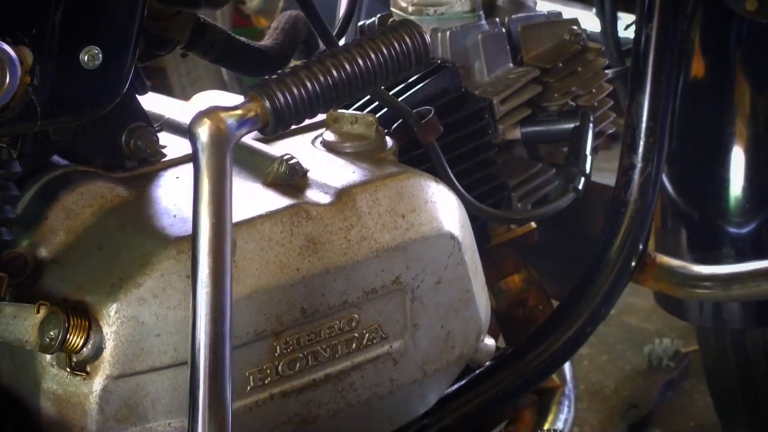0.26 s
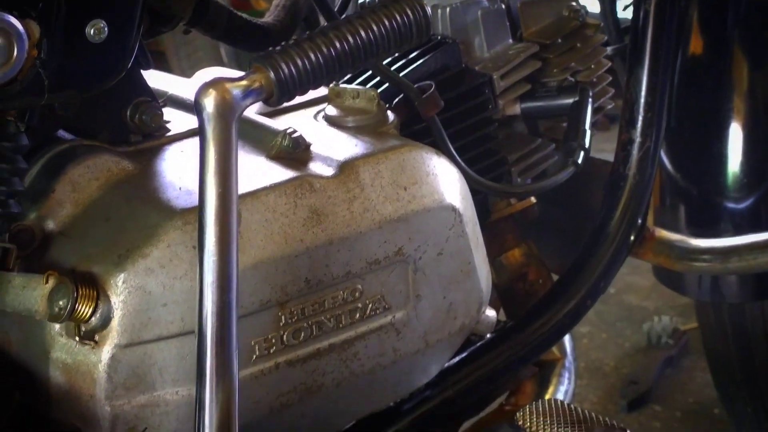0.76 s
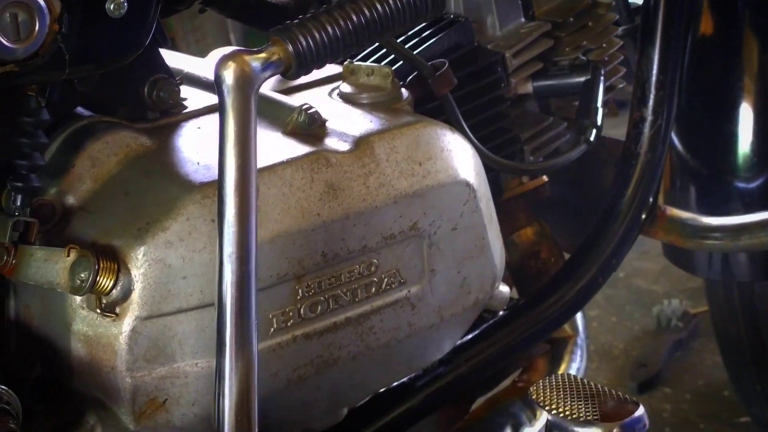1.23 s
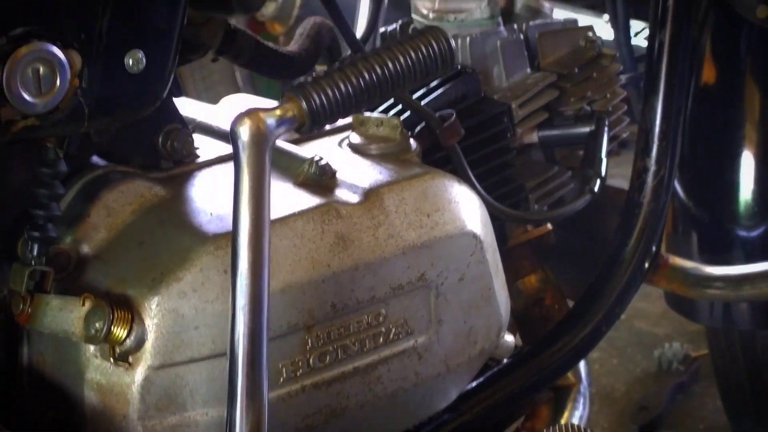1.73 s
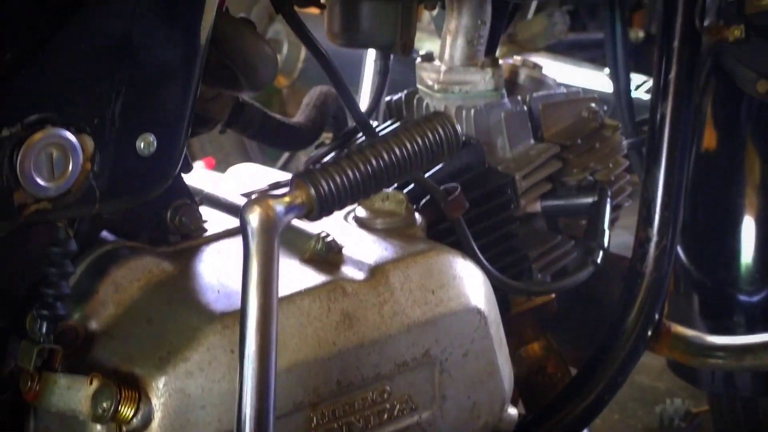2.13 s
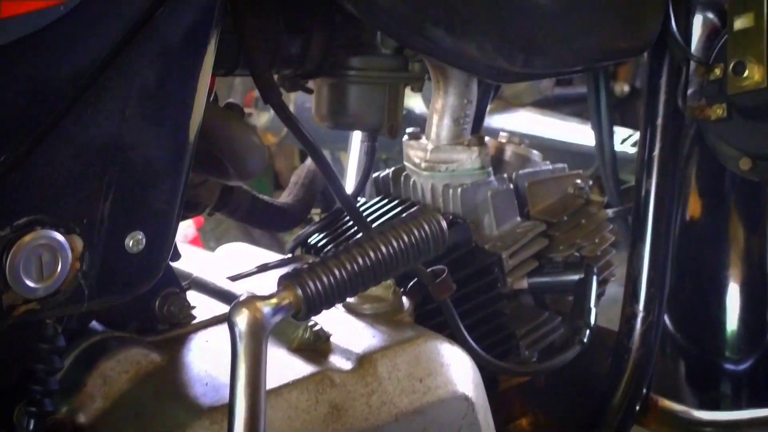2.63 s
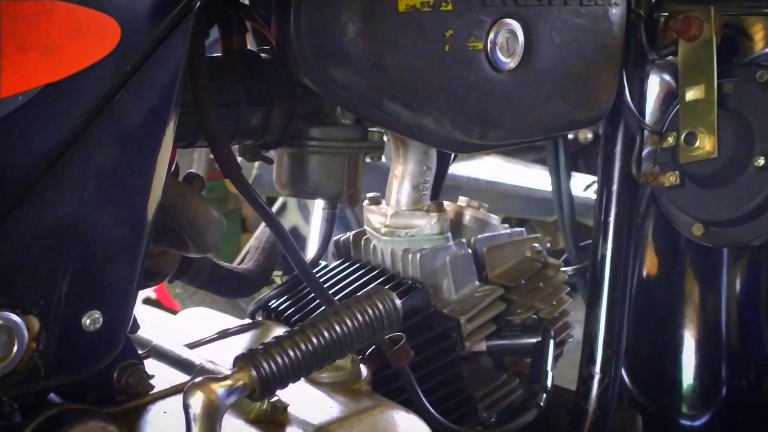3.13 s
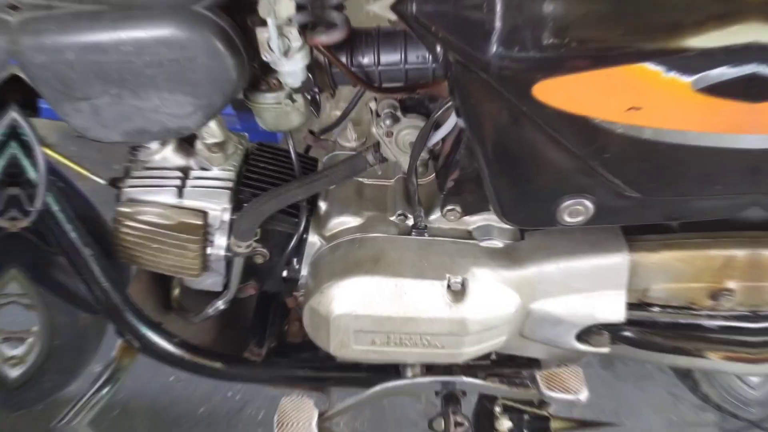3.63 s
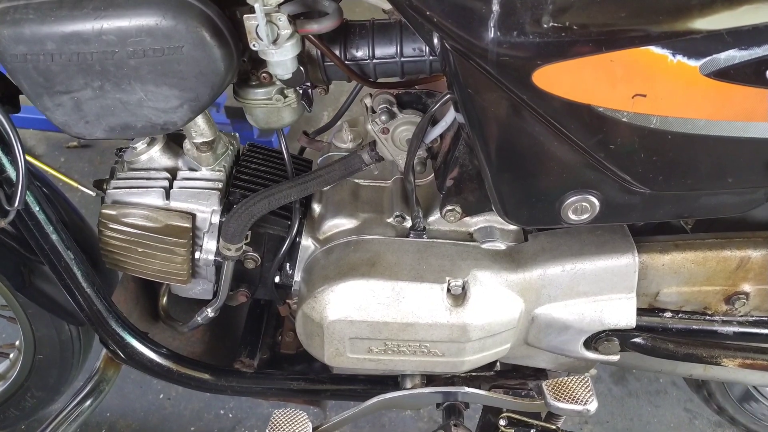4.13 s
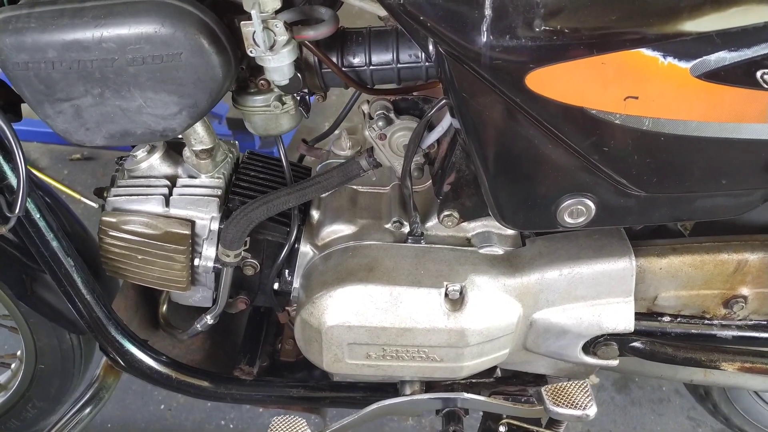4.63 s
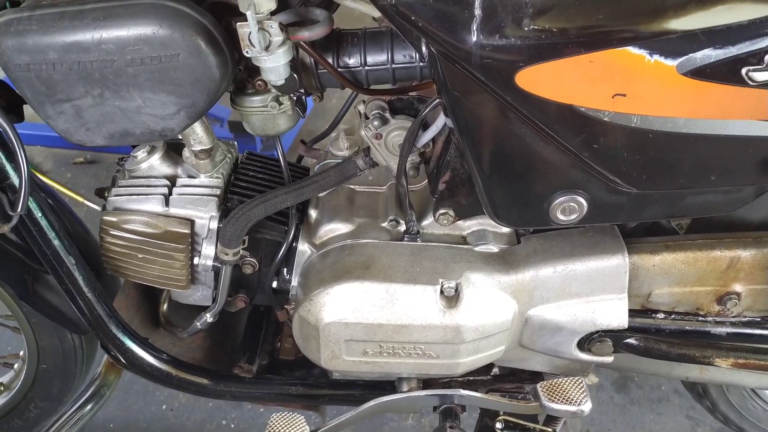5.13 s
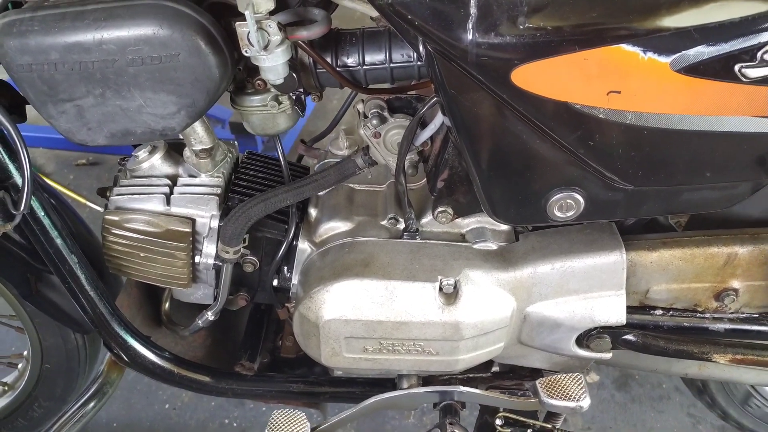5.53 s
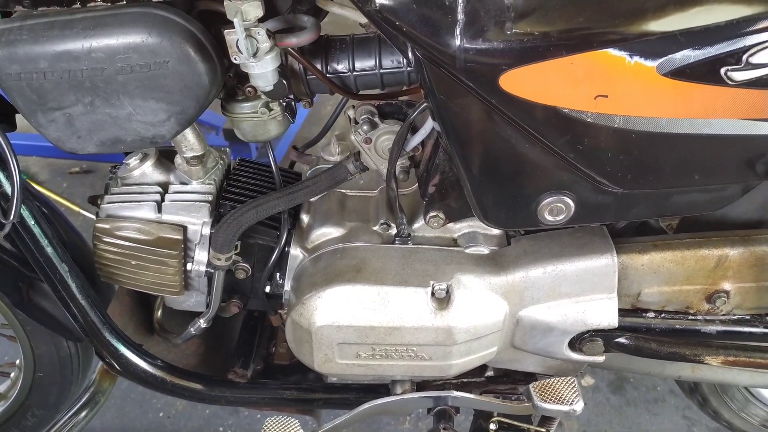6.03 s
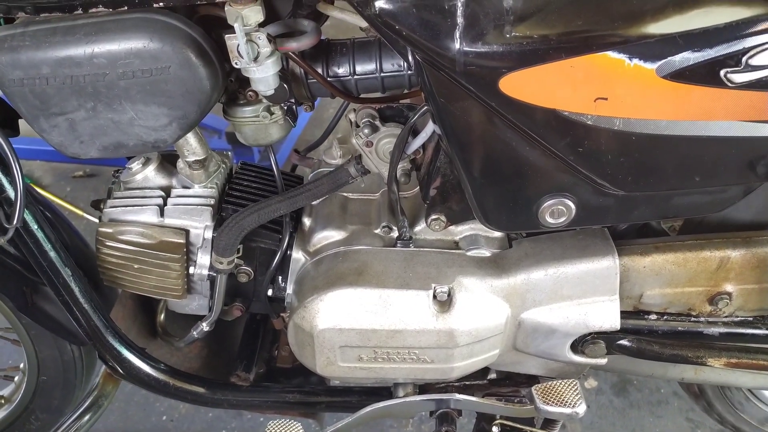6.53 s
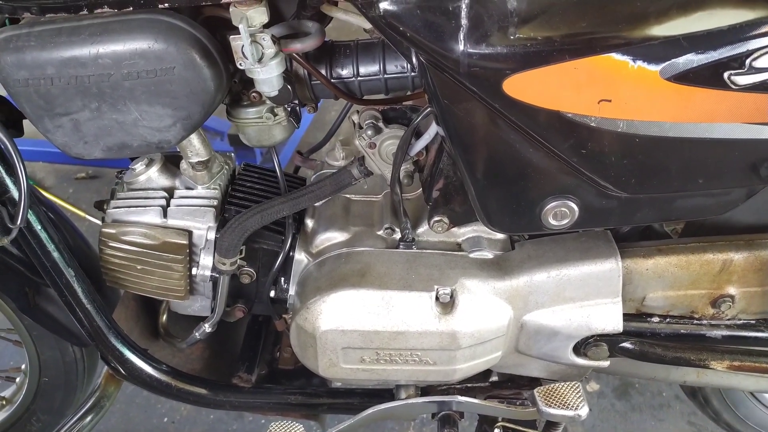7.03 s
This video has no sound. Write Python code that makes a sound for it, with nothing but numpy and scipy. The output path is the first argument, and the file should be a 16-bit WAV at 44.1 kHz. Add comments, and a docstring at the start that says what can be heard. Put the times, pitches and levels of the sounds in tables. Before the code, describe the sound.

Beside the exhaust port of a small single-cylinder motorcycle, an uneven idle chugs about ten times a second, with crisp gas cracks, metal knocks and low pipe thumps. It fades almost to silence midway, then swells back from above the crankcase, with harder casing knocks, ticking valves and softer exhaust. Near the end the throttle is blipped twice, the second rising higher. Close stereo microphone, short workshop reflections.

```python
"""A workshop where a single-cylinder four-stroke idles, heard first beside the exhaust port, then, after a fade
through near silence, from above the crankcase, where the throttle is blipped. Each burn knocks the casing with
noise through its resonances; the opening valve lets out cracks of coloured noise and rings the pipe's sine modes.
Valve ticks, clatter, hiss and rumble are coloured noise too; low tones follow the revs, and the walls reflect it all."""
import sys
import numpy as np
from scipy import signal
from scipy.fft import rfft, irfft, next_fast_len
from scipy.io import wavfile
from scipy.ndimage import uniform_filter1d

SR = 44100
rng = np.random.default_rng(int(sys.argv[2]) if len(sys.argv) > 2 else 0)


def wav_out(sig):
    """Save sig, one row per channel (or a flat mono array), as 16-bit PCM at SR to the path in sys.argv[1]."""
    wavfile.write(sys.argv[1], SR, np.round(np.clip(np.atleast_2d(sig).T, -1, 1) * 32767).astype(np.int16))


N = 321489
TIME = np.arange(N) / SR  # s
CUT_S, REV_S = 3.567, 5.9  # change of place; the blips begin
BURN_LEAD_S = .017  # the burn starts this long before the valve opens at idle

# Three settings share the tables: 0 beside the port, 1 above at idle, 2 above revving. Places are 0 port, 1 above.
# Engine speed while the throttle is blipped, rising in each blip and falling in between.
# Each row: time in s, speed in cycles per s.
SPEED = [(5.86, 8.9), (5.96, 10.8), (6.12, 21.9), (6.2, 27.7), (6.26, 31.9), (6.31, 33.3), (6.45, 28.7),
         (6.53, 26.1), (6.68, 22), (6.75, 26.6), (6.81, 30.8), (6.9, 36.8), (6.95, 39.2), (7.07, 34),
         (7.17, 38.3), (7.29, 43.3)]
# Strength of the burn while the throttle is blipped. Each row: time in s, strength in dB.
LOAD = [(5.95, -24), (6.03, -9.5), (6.09, -22), (6.176, -9.5), (6.23, -16), (6.45, -23.5), (6.6, -22),
        (6.66, -25), (6.72, -18), (6.8, -9), (6.9, -17.5), (7.05, -23), (7.12, -14), (7.29, -13.5)]
# Every chug at idle. Each row: time the exhaust valve opens in s, then knock, crack and thump against usual in dB.
CHUGS = [(0.0253, 5.3, 0.5, 1.5), (0.1252, 3.5, 1, -0.0), (0.2242, 3, 0.5, 1.5), (0.328, 5, -1.3, 0.5),
         (0.4274, 7, 0.5, 1), (0.5259, 3.5, -1.5, 1), (0.6246, -4, -2, -1), (0.7298, -0.1, -2, 0.5),
         (0.8309, -3, 1.5, 0.7), (0.9372, 7, 0.5, 0), (1.0397, 4, 2.8, -0.7), (1.1442, 5, 3.2, 0.4),
         (1.2501, -3, 2.4, -0.5), (1.353, -2.0, 4, 0.5), (1.4613, 1.5, 1, 1), (1.5653, 2.5, 4, -1.5),
         (1.6702, 2, 1, 0.1), (1.7708, -3, 0, 0.5), (1.878, 4, 1.5, 1), (1.9877, -2, 0, -2),
         (2.1112, 0, 1.0, -1.5), (2.2214, -1.2, -1.5, 0.5), (2.3247, 1.1, 0.6, -1), (2.4309, 1, 1, -1),
         (2.5462, -1, 0.5, -3), (2.6596, 2.5, -0.4, -3), (2.7737, 1.2, -0.5, -2.5), (2.8837, 1, -3, -1.5),
         (2.9941, -3, -4.5, -4), (3.1261, 2, -2, -1.5), (3.2333, 2, -0.2, 0), (3.351, -2, 0, -2.5),
         (3.4554, -1.4, 1.5, 1.6), (3.6255, 1, 0.2, 1), (3.7233, -0.5, 1.5, 0), (3.8252, 4, 1, 2),
         (3.9222, -1.5, 2, 1.5), (4.0225, 4, 0.5, -2), (4.1144, 2, 1.5, 0.0), (4.206, -0.7, 0, -1),
         (4.3021, 3.7, 1, 1), (4.3961, -4, 1.5, 1.1), (4.4941, 0, 0, 1), (4.5935, -6, -11, -7),
         (4.7027, 2, -0.5, 0), (4.8035, -0.5, 0.5, 1.5), (4.9044, 1.5, 1.5, 1), (5.0067, -1, 1.5, 0.5),
         (5.109, -2.5, -2, -3), (5.2259, 2.5, 2, -2), (5.3287, -4, 1, 2.5), (5.4355, 4, 0, 3.5),
         (5.5367, -2, 0.5, 0.1), (5.6438, 2.5, 0, 0.3), (5.7514, -5, 1, -0.4), (5.8604, 2.5, 3, 2)]


def amp(db):
    """Amplitude ratio of a level in dB."""
    return 10 ** (np.asarray(db) / 20)


def read(points, hz):
    """A spectrum table on a log-frequency axis."""
    f, value = np.transpose(points)
    return np.interp(np.log(hz + 1), np.log(f + 1), value)


def curve(rows):
    """Every column of a curve at every sample."""
    s, *columns = np.transpose(rows)
    return [np.interp(TIME, s, c) for c in columns]


def train(s, db):
    """One click at each time."""
    out, at = np.zeros(N), np.round(np.asarray(s) * SR).astype(int)
    keep = (at >= 0) & (at < N)
    np.add.at(out, at[keep], amp(db)[keep])
    return out


def bursts(s, db, rise_s, t60):
    """Envelope of noise bursts: quick rise, exponential fall."""
    t = np.arange(SR // 5) / SR
    shape = (1 - np.exp(-t / rise_s)) * amp(-60 * t / t60)
    return signal.oaconvolve(train(s, db), shape)[:N]


def coloured(envelope, colour, grit_db, blows=0):
    """Two-port noise under an envelope, plus single blows, filtered by the colour of each setting in turn."""
    # Likeness of the two microphone ports, by place. Each row: frequency in Hz, likeness from 0 to 1.
    likeness = [
        [(60, .97), (170, .96), (350, .87), (700, .77), (1050, .56), (1550, .25), (2400, .43), (3300, .12),
         (7700, .25), (11000, .1)],
        [(60, .97), (170, .96), (500, .93), (1050, .88), (1250, .45), (1900, .15), (2400, .63), (3300, .2),
         (7700, .28), (11000, .08)],
    ]
    # Balance of the ports, by place. Each row: frequency in Hz, left over right in dB.
    balance = [
        [(60, 0), (600, -1), (1400, 1.5), (3100, 0.5), (8000, -1), (12000, 6.5), (15000, 5)],
        [(60, 2.5), (600, .2), (1400, 1), (3100, 1.5), (8000, -1.5), (12000, 3.5), (15000, 10.5)],
    ]
    # Phase between the ports, by place. Each row: frequency in Hz, lead of the left in radians.
    left_lead = [
        [(60, -.1), (500, -.3), (1050, -.5), (1400, -1.3), (1900, -2.7), (2400, -.7), (4000, -1.4), (7700, 0)],
        [(60, .1), (500, 0), (1050, -.1), (1500, -1.3), (2400, .45), (2800, -.7), (4100, -2.8), (7700, -3)],
    ]
    size = next_fast_len(N + SR // 4)
    hz = np.fft.rfftfreq(size, 1 / SR)
    grit = uniform_filter1d(rng.standard_normal(N), size=60)  # small impacts come and go within milliseconds
    grit = amp(grit_db * grit / grit.std())
    grit = grit / np.sqrt(np.mean(grit ** 2))
    drive = rng.standard_normal((2, N)) * envelope * grit + blows
    setting = (TIME > CUT_S).astype(int) + (TIME > REV_S)
    out = 0
    for k in range(3):
        shared, other = rfft(drive * (setting == k), size)
        place, gain = min(k, 1), colour(k, hz)
        same = np.clip(read(likeness[place], hz), 0, 1)
        right = same * shared + np.sqrt(1 - same ** 2) * other
        right = right * np.exp(-1j * read(left_lead[place], hz))
        lean = amp(read(balance[place], hz) / 2)  # half the difference to each side
        gain = gain / np.sqrt(np.mean(abs(gain) ** 2))
        out = out + np.array([shared * lean, right / lean]) * gain
    return irfft(out, size)[:, :N]


def turns():
    """Cycles run since the last idle chug: the running sum of the speed."""
    (rate,) = curve(SPEED)
    return np.cumsum(rate * (TIME > CHUGS[-1][0])) / SR


def revving(layer):
    """Level of a layer while the throttle is blipped, from speed and strength of the burn."""
    # Laws by layer. Each row: dB at the usual point, dB per doubling of speed, dB per dB of burn.
    laws = dict(crack=(-20, -2.1, 1.1), thump=(-21, 2.5, .3), knock=(-15, .1, 1.05), clatter=(-18, 6.5, .3),
            hiss=(-31, 9, .25), crank=(-38, 33, 1.3), orders=(-29, 4, .4))
    usual_rate, usual_load_db = 30, -15  # cycles per s and burn strength where the laws start
    (rate,), (load_db,), (db, per_doubling, per_db) = curve(SPEED), curve(LOAD), laws[layer]
    return db + per_doubling * np.log2(rate / usual_rate) + per_db * (load_db - usual_load_db)


def levels():
    """Crack, thump, knock, clatter and hiss in dB at every sample, from curves at idle and then from the revs."""
    # Usual idle levels as the microphone drifts from the port to the head, then above. Each row: time in s,
    # then relative levels of crack, pipe thump, burn knock, clatter and gas hiss in dB.
    nearness = [(0, -13.5, -32.5, -30.5, -31.5, -52.5), (1.3, -14, -31.5, -29, -30.5, -46),
                (1.8, -14, -32.5, -25, -30.5, -45), (2.7, -15.5, -31.5, -24, -31.5, -45),
                (3.56, -14.5, -32.5, -26.5, -31.5, -51.5), (3.57, -28, -37, -25.5, -30.5, -48),
                (5.9, -30, -36.5, -24, -31.5, -49.5)]
    rev = [revving(layer) for layer in ("crack", "thump", "knock", "clatter", "hiss")]
    return np.where(TIME < REV_S, curve(nearness), rev)


def cycles(level_db):
    """Time, length and crack, thump and knock levels of every cycle, from the idle chugs and then from the speed."""
    # Burns that stand out while the throttle is blipped.
    # Each row: time in s, change of knock, change of crack and thump in dB.
    odd_burns = [(5.96, 2, 2), (6.04, -6.5, -4.5), (6.092, 10, 10), (6.138, 2, 4.5), (6.178, 0, -4),
                 (6.248, 0.5, 1), (6.372, -10, -11), (6.72, 2.5, 2), (6.76, 0, 2), (6.795, -3.5, -3.5),
                 (6.854, 2, 5.5), (7.029, 5.5, 9), (7.116, 1, -3), (7.19, 0.5, 4.5)]
    # Chance from burn to burn while the throttle is blipped: spread of crack, thump and knock in dB.
    scatter_db = [1.1, 1.2, 1.1]
    idle, knock_db, crack_db, thump_db = np.transpose(CHUGS)
    s = np.hstack([idle, np.flatnonzero(np.diff(np.floor(turns()))) / SR])
    db = level_db[:, (s * SR).astype(int)]
    db[:, :len(idle)] += crack_db, thump_db, knock_db
    db += (rng.standard_normal((len(s), 3)) * scatter_db).T * (s > REV_S)
    for at, knock_change, gas_change in odd_burns:
        db[:, np.argmin(abs(s - at))] += gas_change, gas_change, knock_change
    return s, np.gradient(s), *db


def casing(k, hz, broad, ringing):
    """Ringing of crankcase and cooling fins over their broad colour, each by its share."""
    # Casing and fin modes, by setting. Each row: frequency in Hz, width in Hz, peak over a base of 1 in dB.
    modes = [
        [(796, 40, 6), (1040, 200, 6.5), (1190, 45, 11), (1362, 30, 8), (2453, 90, 11.5), (4090, 230, 7),
         (5000, 200, 3)],
        [(530, 30, 9), (705, 80, 7), (997, 55, 18.5), (1116, 30, 4), (1460, 40, 10), (1530, 50, 9),
         (2450, 60, 15), (2763, 50, 5), (3290, 60, 6), (4110, 170, 8), (5010, 120, 8)],
        [(450, 26, 11), (533, 45, 9), (700, 40, 6), (795, 35, 7), (997, 55, 13), (1455, 40, 8), (1980, 35, 5),
         (2130, 45, 5), (2345, 45, 6), (2445, 40, 15), (2720, 60, 6), (3300, 68, 5), (4080, 300, 5),
         (5100, 200, 3)],
    ]
    # Broad colour under the modes, by setting. Each row: frequency in Hz, density in dB per Hz.
    broad_colour = [
        [(90, -7), (200, 4.5), (350, -0.5), (900, -2), (1500, 0.5), (2000, -7), (3000, -5.5), (3600, -14),
         (5000, -18), (6500, -38)],
        [(110, -3), (230, -1.5), (350, -6), (800, -5.5), (1200, -0.5), (1500, -1), (1900, -8.5), (3000, -8.5),
         (3600, -17.5), (5000, -19.5), (6500, -43)],
        [(110, -9), (220, -3.5), (280, -8.5), (400, -11), (800, -8), (1300, -6.5), (1800, -11.5), (3000, -12.5),
         (3600, -19.5), (5000, -22), (6500, -45)],
    ]
    rings = sum((amp(db) - 1) / (1 + 2j * (hz - f) / width) for f, width, db in modes[k])
    return amp(read(broad_colour[k], hz)) * (broad + ringing * rings)


def struck(tilt_db):
    """Colour of a blow on the casing: mostly its ringing, tilted by dB per octave in each setting."""
    return lambda k, hz: casing(k, hz, .15, 1) * amp(tilt_db[k] * np.log2(hz / 1000 + 0.3))


def knocks(s, length, db):
    """The burn hits the casing before the exhaust valve opens; valves tick and the piston rocks half a cycle later."""
    # Brightness of the burn knock, by setting, in dB per octave.
    knock_tilt_db = [8, 4.5, 4.5]
    # Valve and piston ticks are duller, by setting, in dB per octave.
    tick_tilt_db = [7, 3, 1.5]
    # Valve gear against the burn knock. Each row, by place: intake valve, exhaust valve, piston rock in dB.
    gear_db = [(-17, -7, -6), (-6, -5.5, -6)]
    # Piston knocks that stand out. Each row: time in s, change in dB.
    odd_rocks = [(.554, 7), (.658, 17), (.866, 16), (1.173, -1), (1.384, -2), (1.599, 5), (2.257, 6),
                 (2.579, 6.5), (2.92, 2), (3.661, -13), (3.759, 10), (4.06, -10), (4.239, 11), (4.43, 14),
                 (4.522, -12), (4.627, 14), (4.74, -3), (5.153, -14), (5.679, -3.5), (5.782, 5)]
    near = s < CUT_S  # beside the port the knock is a cluster, from above one hard blow leads it
    burn = s - np.where(s > REV_S, np.clip(.22 * length, .011, .019), BURN_LEAD_S)
    hits = bursts(burn[near] - .002, db[near] - 0.5, 0.003, 0.083)
    hits += bursts(burn[~near], db[~near] + 3, 0.0015, 0.045)
    blows = train(burn + .002, db + np.where(near, 15, 21))
    knock = coloured(hits, struck(knock_tilt_db), grit_db=1.5, blows=blows)

    chance_db = 0.7 * rng.standard_normal((len(s), 3))
    intake_db, seat_db, rock_db = db + (np.take(gear_db, 1 - near, axis=0) + chance_db).T
    intake, seat, rock = burn - 0.087 * length, s + 0.1 * length, burn + length / 2
    for at, odd_db in odd_rocks:
        rock_db[np.argmin(abs(rock - at))] += odd_db
    ticks, ticks_db = np.hstack([intake, seat, rock]), np.hstack([intake_db, seat_db, rock_db])
    rattle = bursts(ticks - .002, ticks_db, .0012, .04)
    return knock + coloured(rattle, struck(tick_tilt_db), grit_db=1.5, blows=train(ticks, ticks_db + 16))


def gas(s, length, crack_db, hiss_db):
    """Gas seeps as the pressure peaks, cracks as the valve lifts and is then swept out, over steady hiss."""
    # Colour of the gas noise, by setting. Each row: frequency in Hz, density in dB per Hz.
    gas_colour = [
        [(1200, -8.5), (2650, -15), (4500, -24), (5570, -12), (7430, -5.5), (8920, -7.5), (9870, -4.5),
         (11800, -15), (14000, -19.5), (16100, -43)],
        [(1200, -43), (2650, -17), (4500, -5), (5010, -19), (5340, -6), (7720, -7), (9970, -2), (12600, -14.5),
         (14300, -19), (16100, -45)],
        [(2650, -50), (4500, -36), (5200, -1.5), (6510, -6.5), (7010, -3), (8010, -4), (10400, 0),
         (15000, -24.5), (16100, -39)],
    ]
    near = s < CUT_S  # beside the port the crack is direct; from above it arrives blurred
    crack = bursts(s[near] - .0012, crack_db[near], .002, .018)
    early = 0.0082 * (s > REV_S)  # while revving the hiss starts earlier, with the burn
    crack += bursts((s - early - .002)[~near], crack_db[~near] - 6.0, 0.001, 0.13)
    seep = bursts(s - BURN_LEAD_S - .006, crack_db - np.where(near, 18, 9), 0.017, 0.12)
    sweep = bursts(s + 0.2 * length, crack_db - np.where(near, 24, 12), 0.011, 0.18)  # the piston pushes the rest out
    level = np.sqrt(crack ** 2 + seep ** 2 + sweep ** 2 + amp(hiss_db + 1.0) ** 2)
    return coloured(level, lambda k, hz: amp(read(gas_colour[k], hz)), grit_db=-1.5)


def pipe(s, db):
    """Each blow-down pulse rings the pipe modes; at high revs they are damped and shifted and carry no deep bass."""
    # Pipe modes, by setting. Each row: frequency in Hz, relative level in dB, t60 in s, build-up in s.
    pipe_modes = [
        [(48.6, 2, .09, .015), (88.6, 0, .18, .0023), (124, -10, .14, .015), (159.5, -1, .23, .015),
         (169.6, .7, .11, .007), (225, -10, .04, .001)],
        [(42, -13, .3, .005), (93, 0, .17, .0034), (113, -6, .24, .015), (162, 4.5, .14, .015),
         (198, 14, .032, .015)],
        [(92, -5, .07, .006), (122, -4, .07, .006), (163, -1, .07, .005), (203, -1, .08, .004),
         (270, -4, .07, .003), (350, -6, .07, .001), (455, -10, .1, .001), (530, -10, .1, .001)],
    ]
    # Travel from the valve down the pipe, by place, in s.
    delay_s = [.0071, .0077]
    # How late the left port hears the pipe, by place, in samples.
    left_lag = [11, -6]
    deep_hz = 60  # modes below this start with a suction instead of a push
    rev_ring_db = -13  # level of the separate pulses, kept under the firing orders that carry the pipe tone
    t = np.arange(SR // 3) / SR
    rings = []
    for modes in pipe_modes:
        ring = 0
        for hz, level_db, t60, rise in modes:
            envelope = amp(level_db - 60 * t / t60) * (1 - np.exp(-t / rise))
            ring = ring + envelope * np.sign(hz - deep_hz) * np.sin(2 * np.pi * hz * t)
        rings.append(ring)
    no_bass = signal.butter(4, 70, "high", fs=SR, output="sos")
    rings[2] = amp(rev_ring_db) * signal.sosfilt(no_bass, rings[2])

    place = (s > CUT_S).astype(int)
    right_s = s + np.take(delay_s, place)
    left_s = right_s + np.take(left_lag, place) / SR
    out = 0
    for ring, now in zip(rings, (s < CUT_S, (s > CUT_S) & (s < REV_S), s >= REV_S)):
        ports = [train(at[now], db[now]) for at in (left_s, right_s)]
        out = out + signal.oaconvolve(ports, ring[None], axes=1)[:, :N]
    return amp(9.5) * out


def shake():
    """Low tones locked to the revs: the crank, which turns twice a cycle, and the firing orders in the hot pipe."""
    # How strongly the hot pipe passes each firing order. Each row: frequency in Hz, relative level in dB.
    hot_pipe = [(60, -13), (88, 2), (100, -3), (118, 0), (138, -6), (165, 1), (183, -5), (205, 2),
                (240, -9), (280, -7), (350, -12), (420, -19)]
    hot_delay_s = .0068  # from the valve to the suction dip that all firing orders share
    # firm burns give one dip a cycle; slack ones let the orders drift apart into a growl
    firm_load_db, slack_load_db = -13, -19
    (rate,), (load_db,) = curve(SPEED), curve(LOAD)
    phase = 2 * np.pi * (turns() - rate * hot_delay_s)
    slack = uniform_filter1d(np.interp(load_db, [slack_load_db, firm_load_db], [1, 0]), size=SR // 12)
    orders = 0
    for k in range(3, 14):
        drift = slack * rng.uniform(-np.pi, np.pi)
        orders = orders + amp(read(hot_pipe, k * rate)) * np.cos(k * phase + drift)
    tones = amp(revving("crank")) * np.cos(2 * phase) + amp(revving("orders")) * orders
    fade_in = np.clip((TIME - REV_S - .1) / .1, 0, 1)
    return -np.sqrt(2) * tones * fade_in


def clatter(s, clatter_db):
    """Chain and valves rattle the casing as gritty noise, which sags through the cycle until the next burn."""
    sag_range_db = 2  # fall over one cycle
    since_burn = (np.interp(TIME, s, np.arange(len(s))) + .2) % 1  # share of the cycle
    sag_db = sag_range_db * (.5 - since_burn)
    return coloured(amp(clatter_db + sag_db), lambda k, hz: casing(k, hz, 1, .4), grit_db=2.5)


def rumble(clatter_db):
    """Deep noise that follows the clatter level."""
    # Colour of the rumble. Each row: frequency in Hz, density in dB per Hz.
    rumble_colour = [(12, -34), (22, -2), (40, -3), (81, -2.5), (123, -2.5), (167, -8.5), (272, -18.5),
                     (350, -5.5), (460, -46), (770, -120)]
    # Rumble against clatter, by setting, in dB.
    offset_db = [-11, -17, -27]
    rumble_db = clatter_db + np.select([TIME < CUT_S, TIME < REV_S], offset_db[:2], offset_db[2])
    return coloured(amp(rumble_db), lambda k, hz: amp(read(rumble_colour, hz)), grit_db=-6.0)


def walls(x):
    """Workshop walls: sparse reflections of random sign, different at each port, without bass."""
    echo_db, echo_t60_s, echoes_per_s = -6, 0.13, 1500
    t = np.arange(SR // 4) / SR
    signs = rng.choice([-1., 1.], (2, len(t)))
    present = rng.random((2, len(t))) < echoes_per_s / SR
    taps = signs * present * (t > .004) * amp(-60 * t / echo_t60_s)
    taps = signal.sosfilt(signal.butter(2, 1000, "high", fs=SR, output="sos"), taps)
    taps = taps / np.linalg.norm(taps, axis=1, keepdims=True)
    return amp(echo_db) * signal.oaconvolve(x, taps, axes=1)[:, :N]


def scene():
    """Engine knocks, gas, pipe, low tones, clatter and rumble, with the workshop's reflections."""
    *burn_db, clatter_db, hiss_db = levels()
    s, length, crack_db, thump_db, knock_db = cycles(np.array(burn_db))
    engine = knocks(s, length, knock_db) + gas(s, length, crack_db, hiss_db) + pipe(s, thump_db)
    engine = engine + shake() + clatter(s, clatter_db) + rumble(clatter_db)
    return engine + walls(engine)


def record(dry):
    """The sound fades almost to silence at the change of place, loud peaks saturate softly; then the band limit."""
    fade_out_s, fade_in_s, fade_bend = 0.53, 0.51, 1.02  # a bend of 1 is a straight ramp
    edge_hz = 16150
    since = TIME - CUT_S
    ramp = np.clip(abs(since) / np.where(since < 0, fade_out_s, fade_in_s), .004, 1)
    faded = dry * ramp ** fade_bend
    soft = 1.3 * np.tanh(faded / 1.3)
    lowpass = signal.firwin(511, edge_hz, window=("kaiser", 9), fs=SR)
    return signal.oaconvolve(soft, lowpass[None], "same")


dry = scene()
out = record(dry)
wav_out(out)
```